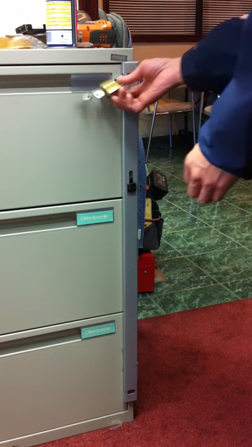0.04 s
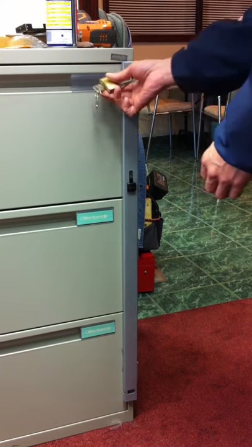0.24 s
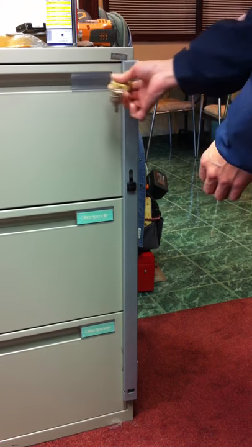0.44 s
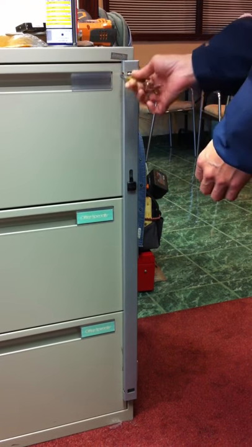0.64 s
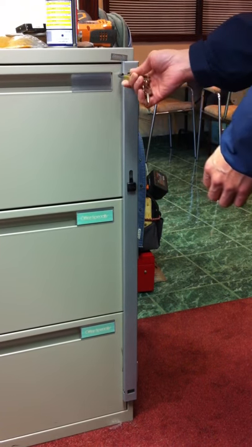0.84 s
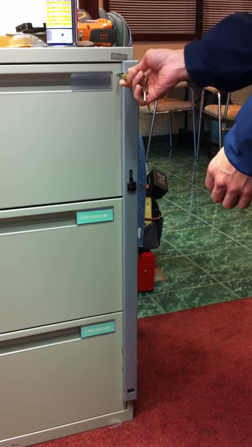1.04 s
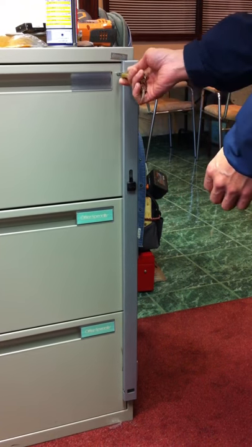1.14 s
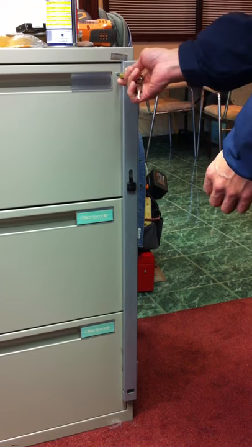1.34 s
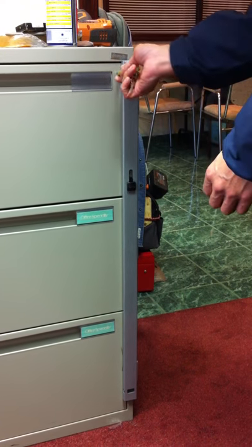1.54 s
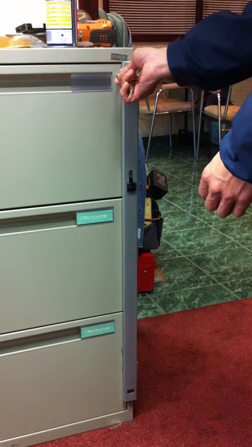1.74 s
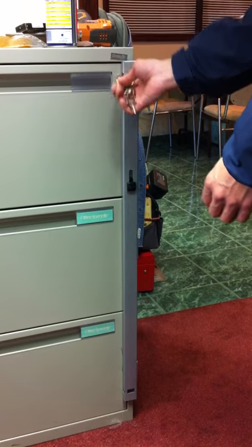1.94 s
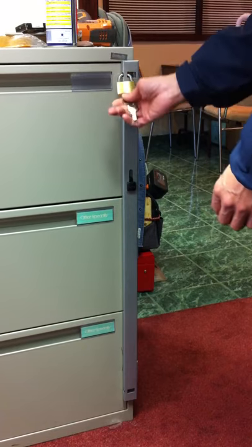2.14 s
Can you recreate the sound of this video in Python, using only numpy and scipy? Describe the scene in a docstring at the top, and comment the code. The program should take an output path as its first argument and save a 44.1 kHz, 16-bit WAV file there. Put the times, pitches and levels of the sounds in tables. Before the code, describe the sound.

A key turns in a metal filing cabinet lock with sharp snaps and light rattles.

```python
"""A bunch of keys is worked in the lock of a steel filing cabinet in a quiet room. The key scrapes in as the
sheet steel booms and rubs under the hand; spare keys clink, pins tick. At 0.2 s the lock snaps, ringing steel
and bolt. More ticks, scrapes and clinks lead to snaps at 0.9 and 1.0 s. After a lull, two snaps come near 1.7
s, the second followed by a quick rebound of the bolt, then a last one amid clinks at 2.1 s. A short room tail
follows each contact."""
import sys
import numpy as np
from scipy import signal
from scipy.fft import rfft, irfft
from scipy.io import wavfile
from scipy.ndimage import uniform_filter1d

SR = 44100
rng = np.random.default_rng(int(sys.argv[2]) if len(sys.argv) > 2 else 0)


def dump_mix(stems):
    """Bounce the given channels to the path in sys.argv[1] as a 16-bit WAV at rate SR."""
    frames = np.atleast_2d(stems).T  # one column per channel
    limited = np.clip(frames, -1, 1)  # hard clip at full scale
    pcm = np.round(limited * 32767).astype(np.int16)
    wavfile.write(sys.argv[1], SR, pcm)


N = 97020  # 2.2 s


def amp(db):
    """Decibels to gain."""
    return 10 ** (np.asarray(db) / 20)


def unit_rms(x):
    """Scale to rms 1."""
    return x / np.sqrt(np.mean(x ** 2) + 1e-20)


def log_interp(points, hz):
    """Interpolate (f, value) rows over log frequency."""
    f, value = np.transpose(points)
    return np.interp(np.log(hz + 1), np.log(f + 1), value)


def add(mix, at_s, sound):
    """Mix a sound in at at_s."""
    part = mix[max(round(at_s * SR), 0):][:len(sound)]
    part += sound[:len(part)]


def seconds(size=24000):
    """Time axis of one event."""
    return np.arange(size) / SR


def noise(spectrum):
    """Steady coloured noise, rms 1."""
    gain = amp(log_interp(spectrum, np.fft.rfftfreq(N, 1 / SR)))
    return unit_rms(irfft(rfft(rng.standard_normal(N)) * gain, N))


def minimum_phase(gain):
    """Minimum-phase impulse response from a magnitude spectrum."""
    log_gain = np.log(gain + 1e-9)
    mirrored = np.r_[log_gain, log_gain[-2:0:-1]]
    return np.fft.ifft(np.exp(signal.hilbert(mirrored).conj())).real[:4096]


def ring(modes, rise_s=0.0011):
    """Struck metal: damped sines in random phase."""
    t = seconds()
    sines = sum(amp(db - 60 * t / t60) * np.sin(2 * np.pi * (hz * t + rng.random()))
                for hz, db, t60 in modes)
    return sines * (1 - np.exp(-t / rise_s))


# Early room decay: f/Hz, t60/s
ROOM_DECAY = [(100, 0.17), (300, 0.66), (800, 0.22), (2000, 0.13), (5000, 0.13), (10000, 0.12),
              (16000, 0.068)]
def room(direct=0.69, echo=0.7, echo_s=0.0023, build_s=0.0014, late_db=-29, late_t60_s=0.48):
    """Direct sound, a reflection off the cabinet front, a dense tail whose treble dies first."""
    t = seconds()
    hz, frame_s, spectra = signal.stft(rng.standard_normal(len(t)), SR, nperseg=256)
    early = amp(-60 * frame_s / log_interp(ROOM_DECAY, hz)[:, None])
    late = amp(late_db - 60 * frame_s / late_t60_s)
    response = signal.istft(spectra * (early + late), SR)[1][:len(t)] * (1 - np.exp(-t / build_s))
    response /= np.linalg.norm(response)
    response[0] += direct
    response[round(echo_s * SR)] += echo
    return response


def contact(build_s, chatter_s):
    """Metal on metal: tiny uneven bounces build up and die, energy 1."""
    t = seconds(3000)
    bounces = rng.standard_normal(len(t)) * np.exp(rng.standard_normal(len(t)))
    bounces *= np.exp(-t / chatter_s) * (1 - np.exp(-t / build_s))
    return bounces / np.linalg.norm(bounces)


def knock(build_s, chatter_s, flatten=0.54, size=32768):
    """A contact in the room, its spectrum partly flattened."""
    spectrum = rfft(signal.fftconvolve(contact(build_s, chatter_s), room()), size)
    power = uniform_filter1d(abs(spectrum) ** 2, size=100)
    equaliser = minimum_phase((power / power.mean()) ** (-flatten / 2))
    return signal.fftconvolve(irfft(spectrum), equaliser)[:size]


# Lock barrel resonances: f/Hz, width/Hz, level/dB
BARREL_MODES = [(1400, 120, -16.5), (1641, 45, -0.5), (1777.6, 43.4, -5), (1965, 61, -10.5),
                (2233, 35, -10.5), (2517, 120, -11), (2930, 100, -15), (3290, 36, -22), (4017, 110, -18.5)]
# Sub, boom, panel, barrel, edge and sizzle bands: f/Hz
LOCK_BANDS_HZ = [30, 190, 700, 2100, 5200, 12000]
# Same bands: width/Hz
LOCK_WIDTHS_HZ = np.array([260, 260, 800, 2100, 4500, 8000])
def lock_body(band_db, barrel_db, soft_db_per_oct=0, gap_hz=1080, gap_oct=0.85, gap_db=-1.5):
    """Lock in its cabinet: broad bands, barrel peaks, a gap between panel and barrel modes."""
    hz = np.fft.rfftfreq(8192, 1 / SR)
    main_hz = max(BARREL_MODES, key=lambda mode: mode[2])[0]
    peaks = np.ones(len(hz))
    for mode_hz, width_hz, db in BARREL_MODES:
        height = amp(barrel_db + db - soft_db_per_oct * abs(np.log2(mode_hz / main_hz)))
        peaks += height ** 2 / (1 + (2 * (hz - mode_hz) / width_hz) ** 2)
    density_db = np.array(band_db) - 10 * np.log10(np.asarray(LOCK_WIDTHS_HZ) / (SR / 2))
    density_db[3] -= 10 * np.log10(peaks[(hz > 1400) & (hz < 3500)].mean())  # offset the peaks' power
    broad_db = log_interp(list(zip(LOCK_BANDS_HZ, density_db)), hz)
    dip_db = gap_db * np.exp(-(np.log2((hz + 1) / gap_hz) / gap_oct) ** 2)
    return minimum_phase(amp(broad_db + dip_db) * np.sqrt(peaks))


# Room air spectrum: f/Hz, level/dB
AIR_SPECTRUM = [(15, -55), (25, -17.5), (39, -46.5), (153, -14), (206, -0.5), (236, -4.5), (416, -16),
                (1330, -17.5), (2050, -21.5), (2550, -24), (3250, -20), (3720, -22.5), (16000, -22)]
def air(level_db=-66.5):
    """Still room air: faint, low, steady noise."""
    return amp(level_db) * noise(AIR_SPECTRUM)


# Drawer and panels shifting: t/s, boom level/dB, rub level/dB
PANEL_SHIFTS = [(0.0, -46, -41.5), (0.2, -55.5, -52.5), (0.21, -46, -42), (0.31, -49, -50),
                (0.54, -68, -64), (0.58, -53.5, -50.5), (0.78, -61.5, -63), (0.88, -50, -40),
                (0.98, -61.5, -65.5), (1.09, -47.5, -44), (1.18, -63.5, -65), (1.45, -67.5, -72),
                (1.59, -55.5, -62.5), (1.7, -44, -36.5), (1.83, -57, -65), (1.91, -64.5, -72.5),
                (2.12, -53.5, -52.5), (2.2, -62, -60.5)]
# Panel boom: f/Hz, level/dB
BOOM_SPECTRUM = [(25, -31), (50, -55), (75, -11), (100, -9), (122, -6.5), (148, 5), (180, -4.5), (230, 0.5),
                 (320, -10), (500, -11), (1000, -53.5)]
# Panel rub: f/Hz, level/dB
RUB_SPECTRUM = [(200, -26), (380, -8.5), (550, 6), (800, 1.5), (1200, -8.5), (2500, -3.5), (6000, -13.5),
                (16000, -20)]
def cabinet(boom_gain_db=-3.5, rub_gain_db=-6.5):
    """Sheet steel booms and rubs as the hand leans on the lock."""
    at_s, boom_db, rub_db = np.transpose(PANEL_SHIFTS)
    t = seconds(N)
    boom = amp(np.interp(t, at_s, boom_db) + boom_gain_db) * noise(BOOM_SPECTRUM)
    rub = amp(np.interp(t, at_s, rub_db) + rub_gain_db) * noise(RUB_SPECTRUM)
    return boom + rub


# Key sliding in the keyway: t/s, length/s, level/dB, grind/dB, rasp/dB
KEY_SLIDES = [(0, 0.019, -46, -30, -7), (0.556, 0.046, -59, -14, -34), (0.616, 0.11, -54.5, -29.5, -22),
              (0.809, 0.034, -59.5, -29, -25), (1.634, 0.038, -56.5, 11, -34), (1.993, 0.026, -67, 2, -23)]
def key_slides(slips_per_s=500, gain_db=-2, sub_db=-45, boom_db=-25, sizzle_db=-5):
    """Tiny slips of the key's teeth keep the barrel ringing."""
    out = np.zeros(N)
    for at_s, length_s, db, grind_db, rasp_db in KEY_SLIDES:
        slips = (rng.standard_normal(N) * (rng.random(N) < slips_per_s / SR))[:int(length_s * SR)]
        slips = unit_rms(slips) * signal.windows.tukey(len(slips))
        band_db = [sub_db, boom_db, grind_db, 0, rasp_db, rasp_db + sizzle_db]
        scrape = signal.fftconvolve(slips, lock_body(band_db, barrel_db=30, soft_db_per_oct=22))
        add(out, at_s, amp(db + gain_db) * signal.fftconvolve(scrape, room()))
    return out


# Key modes: f/Hz, level/dB, t60/s
KEY_MODES = [(7926, -4.5, .1), (8945, -8, 0.15), (10020, -0.5, .05), (10700, -6, .04), (11060, 1.5, .07),
             (11475, 8, .09), (11500, -2.5, .06), (12000, -11, .04)]
# Spare keys touching: t/s, ring level/dB, click level/dB
KEY_CLINKS = [(.004, -61, -47), (.097, -54.5, -73), (0.136, -56.5, -70), (.305, -50.5, -73),
              (0.323, -55, -75), (0.404, -72, -96), (.676, -72, -61.5), (0.685, -58, -55.5),
              (0.764, -58, -62), (0.779, -51, -64), (1.956, -69, -68), (2.023, -65, -60)]
def key_clinks(ring_gain_db=-4, click_gain_db=25, highpass_hz=3500, build_s=0.00036, detune=0.0062):
    """Hanging keys brush each other: a high, uneven ring and a thin click."""
    out = np.zeros(N)
    highpass = signal.butter(2, highpass_hz, "high", fs=SR, output="sos")
    for at_s, ring_db, click_db in KEY_CLINKS:
        modes = [(hz * (1 + detune * rng.standard_normal()), db, t60) for hz, db, t60 in KEY_MODES]
        ringing = signal.fftconvolve(ring(modes), knock(build_s, chatter_s=0.0071))
        click = signal.sosfilt(highpass, knock(build_s, chatter_s=0.002))
        add(out, at_s, amp(ring_db + ring_gain_db) * ringing)
        add(out, at_s, amp(click_db + click_gain_db) * click)
    return out


# Key on the pins: t/s, level/dB, brightness/dB, chatter/s
PIN_TICKS = [(.029, -33, -19, 0.0031), (0.084, -44, -17, 0.002), (0.144, -49.5, -6, 0.0067),
             (0.164, -40.5, -11.5, 0.0045), (0.2, -34.5, -14, .006), (0.282, -43, -3.5, 0.0052),
             (.322, -45.5, -2, 0.0034), (0.392, -46, -15, 0.0091), (.543, -45.5, -10, 0.0091),
             (.559, -46, -12, 0.0076), (0.692, -70, -20, 0.0025), (0.71, -57.5, -12, 0.0035),
             (.805, -45, -21.5, 0.0027), (0.821, -44, -18, 0.0027), (1.007, -55, -39, 0.0034),
             (1.087, -50, -35, 0.0068), (1.242, -55.5, -43, 0.0068), (1.512, -61, -22, 0.0091),
             (1.652, -72, -30, .008), (1.974, -63.5, -4, 0.0051), (2.045, -51.5, -20, 0.0084),
             (2.086, -47, -12, 0.011), (2.109, -49.5, 3.5, 0.0051)]
def pin_ticks(gain_db=24, build_s=0.00098, sub_db=-45, boom_db=-22, panel_db=-13, sizzle_db=-12):
    """Light touches of the key on the pins excite the barrel."""
    out = np.zeros(N)
    for at_s, db, bright_db, chatter_s in PIN_TICKS:
        band_db = [sub_db, boom_db, panel_db, 0, bright_db, bright_db + sizzle_db]
        body = lock_body(band_db, barrel_db=18, soft_db_per_oct=-1)
        add(out, at_s, amp(db + gain_db) * signal.fftconvolve(knock(build_s, chatter_s), body))
    return out


# Short pitched metal sounds: t/s, f/Hz, level/dB, t60/s
METAL_PINGS = [(0.147, 2620, -39, 0.09), (0.558, 3410, -51, 0.24), (0.676, 4450, -37.5, 0.0099),
               (.709, 4860, -40, 0.008), (.770, 3455, -63, 0.15), (0.861, 3920, -41.5, 0.21),
               (1.03, 8220, -41.5, .14), (2.105, 2617, -39.5, 0.075), (2.112, 3524, -43, 0.15)]
def metal_pings(wet=0.45):
    """One mode each: single keys ringing, plus two very brief pin ticks near 0.7 s."""
    out = np.zeros(N)
    for at_s, *mode in METAL_PINGS:
        tone = ring([mode])
        in_room = signal.fftconvolve(tone, knock(build_s=0.00036, chatter_s=0.002))[:len(tone)]
        add(out, at_s, tone + wet * in_room)
    return out


# Cabinet steel modes: f/Hz, level/dB, t60/s
STEEL_MODES = [(701, -2.5, 0.15), (910, -7, 0.23), (1365, -3, 0.18), (2333, -15, 0.23), (2646, -2, 0.13),
               (2805, 10.5, 0.054), (4060, 1.5, 0.15), (4942, 12, 0.04), (5670, -9, 0.06), (7618, 1, 0.03),
               (9400, 9, 0.043), (11478, -6, 0.25)]
# Bolt modes: f/Hz, level/dB, t60/s
BOLT_MODES = [(2670, -8.5, 0.08), (10000, -1, 0.13), (11300, -8, 0.17), (12600, 6, 0.081),
              (14900, 5.5, 0.077), (15468, 8.5, 0.066), (15960, -2.5, 0.15)]
# Lock snaps: t/s, build/s, chatter/s, level/dB (six lock bands, barrel peaks, steel, bolt)
SNAPS = [(0.2101, 0.0036, 0.0025, -54, -54, -34, -20.5, -21, -19, 3, -31, -46),
         (0.8579, 0.0046, 0.003, -82, -70, -45.5, -26, -34.5, -31, 16.7, -71, -59),
         (1.0292, 0.0018, 0.0049, -91, -58.5, -45, -29, -37.5, -45, 28.4, -56.5, -64),
         (1.6257, 0.0044, 0.0038, -69, -47, -46, -38.5, -49, -46.5, 4.7, -57.5, -68),
         (1.6804, 0.00046, 0.0038, -58, -54.5, -45, -36, -31.5, -24, 6.8, -46, -40),
         (1.6895, 0.0011, 0.0044, -52, -60, -41.5, -31.5, -48.5, -37, 8.7, -46, -39),
         (2.0761, 0.0024, 0.0086, -82, -61, -52, -38, -39.5, -49.5, 24, -52.5, -61)]
def lock_snaps(gain_db=23):
    """The lock snaps over; cabinet steel and bolt ring on."""
    out = np.zeros(N)
    for at_s, build_s, chatter_s, *band_db, barrel_db, steel_db, bolt_db in SNAPS:
        clack = signal.fftconvolve(knock(build_s, chatter_s), lock_body(band_db, barrel_db))
        add(out, at_s, amp(gain_db) * clack)
        add(out, at_s, amp(steel_db) * ring(STEEL_MODES) + amp(bolt_db) * ring(BOLT_MODES))
    return out


def scene():
    """Lock, keys and cabinet over room air, mono."""
    lock = lock_snaps() + pin_ticks() + key_slides()
    return (lock + key_clinks() + metal_pings() + cabinet() + air())[None]


def record(dry):
    """Low-pass at 16.1 kHz."""
    lowpass = signal.firwin(401, 16100, window=("kaiser", 8), fs=SR)
    return signal.oaconvolve(dry, lowpass[None], "same")


dry = scene()
out = record(dry)
dump_mix(out)
```